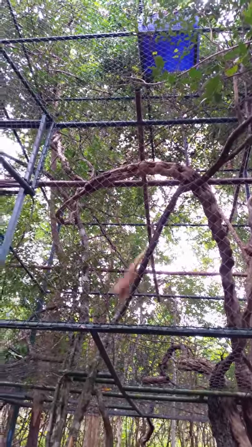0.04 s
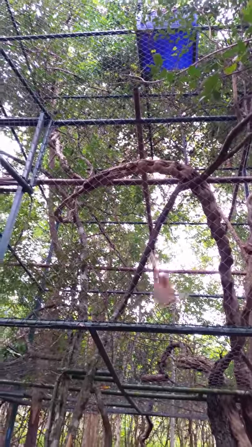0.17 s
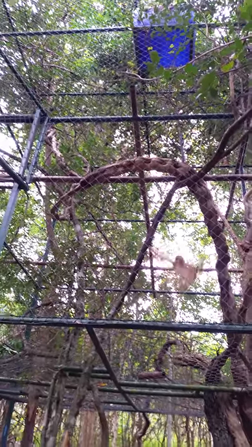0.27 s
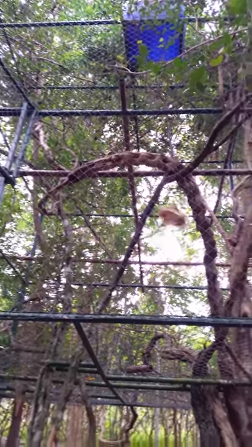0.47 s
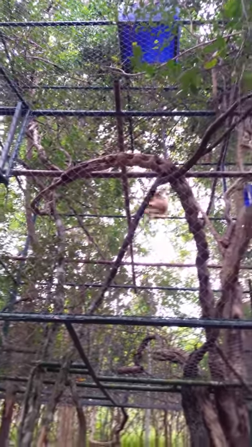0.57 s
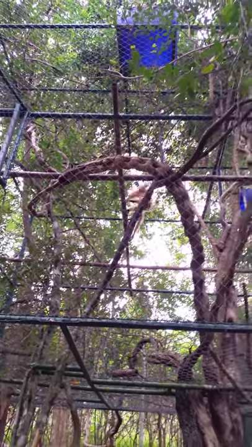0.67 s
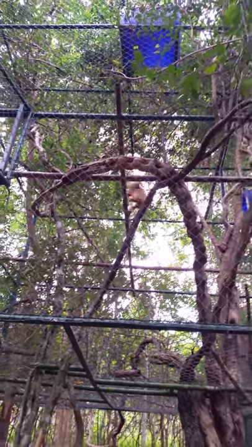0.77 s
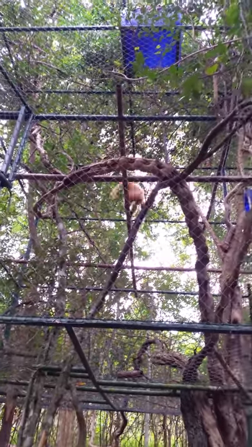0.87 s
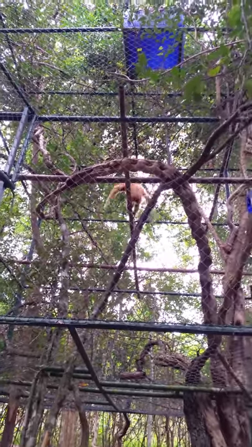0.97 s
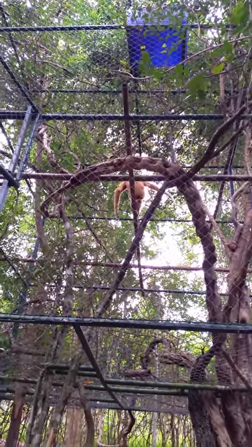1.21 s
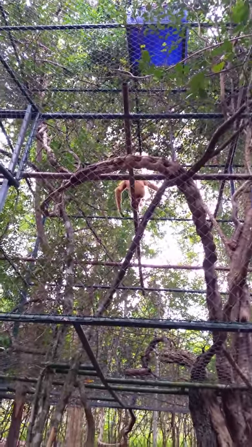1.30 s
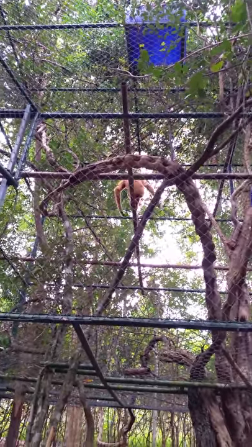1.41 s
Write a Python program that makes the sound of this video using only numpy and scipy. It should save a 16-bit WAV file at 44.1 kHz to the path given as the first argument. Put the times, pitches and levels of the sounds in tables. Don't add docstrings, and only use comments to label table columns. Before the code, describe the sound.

A gibbon gives three loud rising whoops, each stopping suddenly, echoing through a large leafy outdoor cage

```python
import sys
import numpy as np
from scipy import signal
from scipy.fft import rfft, irfft
from scipy.io import wavfile
from scipy.ndimage import uniform_filter1d, minimum_filter1d

SR = 44100
rng = np.random.default_rng(int(sys.argv[2]) if len(sys.argv) > 2 else 0)


def level_to_linear(level):
    exponent = np.asarray(level, float) / 20
    return 10 ** exponent


def materialize(psi):
    bounded = np.clip(np.atleast_2d(psi).T, -1, 1)
    quanta = np.round(bounded * 32767).astype(np.int16)
    wavfile.write(sys.argv[1], SR, quanta)


N = 63945
LEAD = SR // 2


def evened(x):
    return x / np.sqrt(np.mean(x ** 2) + 1e-20)


def read(points, hz):
    f, value = np.transpose(points)
    return np.interp(np.log(hz + 1), np.log(f + 1), value)


def colour(x, db_of):
    size = x.shape[-1]
    return irfft(rfft(x) * level_to_linear(db_of(np.fft.rfftfreq(size, 1 / SR))), size)


def add(mix, s, sound):
    part = mix[LEAD + round(s * SR):][:len(sound)]
    part += sound[:len(part)]


def wobble(count, size):
    once = uniform_filter1d(rng.standard_normal(count), size)
    return evened(uniform_filter1d(once, size))


def background():
    # frequency in Hz, density in dB.
    hum_curve = [(15, -40), (30, -18), (60, 0), (97, -1), (137, -8), (220, -21), (350, -33), (700, -33)]
    # frequency in Hz, gain in dB.
    air_curve = [(700, -30), (1500, -3), (4000, -10), (6000, -18), (7000, -50), (11000, -46), (13000, -30),
                 (15000, -45)]
    hum_db, air_db, same = -59.5, -66, 0.91
    a, b, c, d = rng.standard_normal((4, N))
    hum = np.array([a, same * a + np.sqrt(1 - same ** 2) * b])
    hum = colour(hum, lambda f: read(hum_curve, f) - 30 * (f > 800) - 30 * (f < 22))
    air = colour(np.array([c, d]), lambda f: read(air_curve, f))
    return level_to_linear(hum_db) * evened(hum) + level_to_linear(air_db) * evened(air)


def rustle(length_s, centre_hz, width_hz, db):
    grain_db = 2.5
    u = np.arange(0, length_s, 1 / SR) / length_s
    grains = rng.standard_normal(len(u)) * level_to_linear(grain_db * wobble(len(u), 80))
    band = colour(grains, lambda f: -6 * np.minimum(((f - centre_hz) / width_hz * 2) ** 2, 12))
    return level_to_linear(db) * np.sin(np.pi * u ** 0.43) * evened(band)


def rustles(mix):
    # start in seconds, length in seconds, centre in Hz, width in Hz.
    leaf_rows = [(.135, .08, 10300, 3500), (.16, .05, 7300, 1500), (.33, .14, 10500, 5000),
                 (.44, .014, 6800, 2500), (.36, .2, 400, 500), (.74, .15, 8500, 5000),
                 (.2, .1, 12500, 3000), (.66, .11, 450, 400), (-.15, .2, 9000, 5000),
                 (1.09, .2, 12500, 2000), (1.11, .2, 4800, 2200), (.7, .17, 5000, 3000),
                 (-.1, .3, 400, 400), (1.085, .014, 10500, 7000), (.96, .12, 13000, 2000),
                 (.64, .18, 13000, 3000), (.64, .1, 9800, 2500), (.36, .04, 9000, 1200)]
    leaf_db = [-53, -52.5, -54.5, -48.5, -52.5, -60, -48.5, -58.5, -59, -64, -52, -48, -66.5, -64.5, -73.5,
               -67, -69.5, -46]
    for (s, *row), db in zip(leaf_rows, leaf_db):
        add(mix, s, rustle(*row, db + 7))


def glide(length_s, from_hz, to_hz, db, bend, over_db, jitter, swell):
    flutter_db, soft_s = 2, .005
    u = np.arange(0, length_s, 1 / SR) / length_s
    hz = (from_hz + (to_hz - from_hz) * u ** bend) * (1 + jitter * wobble(len(u), 40))
    phase = 2 * np.pi * np.cumsum(hz) / SR
    tone = np.sin(phase)
    for k, harmonic_db in enumerate(over_db, 2):
        if k * to_hz < SR / 3:
            tone = tone + level_to_linear(harmonic_db) * np.sin(k * phase)
    arch = np.sqrt(np.sin(np.pi * u ** swell)) * np.minimum(u * length_s / soft_s, 1)
    return level_to_linear(db + flutter_db * wobble(len(u), 150)) * arch * np.sqrt(2) * tone


def wheezes(mix):
    # start in seconds, length in seconds, from Hz, to Hz, pitch jitter as a share.
    wheeze_rows = [(.768, .056, 3400, 5600, .035), (1.17, .026, 2500, 3350, .03),
                   (1.195, .08, 3700, 6800, .03), (1.27, .22, 6750, 6800, .008),
                   (1.33, .06, 5350, 5400, .015), (.438, .012, 5000, 5250, .035),
                   (.165, .05, 10330, 10380, .003)]
    wheeze_db = [-46, -39, -54, -74, -64, -46, -52]
    for (s, *row, jitter), db in zip(wheeze_rows, wheeze_db):
        add(mix, s, glide(*row, db + 11, 0.58, [], jitter, 0.4))


def thuds(mix):
    # start in seconds, length in seconds, from Hz, to Hz.
    thud_rows = [(.342, .05, 400, 230), (.645, .034, 390, 250), (.39, .025, 420, 480),
                 (.525, .03, 260, 230), (1.28, .04, 190, 160)]
    thud_db = [-53, -47.5, -58.5, -58.5, -65]
    for (s, *row), db in zip(thud_rows, thud_db):
        add(mix, s, glide(*row, db, 0.57, [], 0.015, 0.47))


def squeaks(mix):
    # start in seconds, length in seconds, from Hz, to Hz, bend of the slide.
    squeak_rows = [
        (.349, .034, 3000, 4850, 1.05),
        (.381, .055, 3900, 4650, .5),
        (.812, .14, 4400, 4500, .7),
    ]
    squeak_db = [-23.5, -32, -50]
    # harmonic 2 in dB, harmonic 3 in dB.
    squeak_over_db = [
        [-32, -30],
        [-22, -28],
        [-25, -13],
    ]
    for (s, *row, bend), db, over_db in zip(squeak_rows, squeak_db, squeak_over_db):
        add(mix, s, glide(*row, db, bend, over_db, .011, 0.14))


def overtones(hz, phase, harmonics_db, close_db, top_hz):
    # frequency in Hz, gain in dB.
    mouth = [(1200, 20.5), (1900, 10.5), (2600, 5), (3300, -4), (4300, -10.5), (5200, -2.5), (7000, -1.5),
             (12000, -1)]
    close_hz, high_fade, patchy_db = 1100, .8, 2
    thin_db = close_db * np.maximum(np.log2(hz / close_hz), 0)
    total = np.zeros(len(hz))
    for k, harmonic_db in enumerate(harmonics_db, 2):
        db = harmonic_db + read(mouth, k * hz) + thin_db * (2 + high_fade * (k - 4.5))
        if k == 2:
            db = db - 22 / (1 + (top_hz / (k * hz)) ** 14)
        else:
            db = db + patchy_db * wobble(len(hz), 300)
        total += level_to_linear(db) * np.sin(k * phase) * (k * hz < SR / 3)
    return total


def whoop(rows, pitch, harmonics_db, close_db, dull_db, top_hz, rasp):
    # frequency in Hz, gain in dB.
    breath_curve = [(800, -20), (2000, 0), (5000, -0.5), (6500, -12.5), (8500, -2.5), (11000, -18),
                    (12500, -23), (14500, -16)]
    # time in seconds, half width in seconds, level change in dB.
    level_dips = [(.281, 0.0041, -9.5), (0.313, 0.0072, -12), (0.327, 0.0013, -4), (.698, 0.0015, -28),
                  (0.723, 0.0026, -2.5), (.737, 0.0029, 7.5), (1.101, 0.0033, -10.5), (1.133, 0.0015, -5.5),
                  (1.148, 0.001, -3), (1.167, 0.0011, -21)]
    jitter, breath_db, dull_hz = 0.014, -28, 6700
    swell_s, stop_s = .016, 0.0014
    s, db, over_db = np.transpose(rows)
    t = np.arange(s[0], s[-1], 1 / SR)
    hz = uniform_filter1d(np.interp(t, *np.transpose(pitch)), size=300, mode="nearest")
    hz = hz * (1 + jitter * wobble(len(t), 60))
    phase = 2 * np.pi * np.cumsum(hz) / SR

    over = overtones(hz, phase, harmonics_db, close_db, top_hz)
    rasp = rasp * np.clip(2 * np.log2(hz / 980), 0, 1)
    over = over * (1 - rasp + rasp * wobble(len(t), 40))
    breath = evened(colour(rng.standard_normal(len(t)), lambda f: read(breath_curve, f)))

    level = level_to_linear(uniform_filter1d(np.interp(t, s, db), size=200, mode="nearest"))
    level = level * np.clip(np.minimum((s[-1] - t) / stop_s, (t - s[0]) / swell_s), 0, 1)
    for at_s, half_s, dip_db in level_dips:
        level = level * level_to_linear(dip_db * np.exp(-((t - at_s) / half_s) ** 2))
    voice = np.sin(phase) + level_to_linear(np.interp(t, s, over_db)) * over + level_to_linear(breath_db) * breath
    return colour(np.sqrt(2) * level * voice, lambda f: dull_db / (1 + (dull_hz / (f + 1)) ** 12))


def whoops(mix):
    # time in seconds, level in dB, overtone strength in dB.
    efforts = [
        [(.181, -22, -31), (.192, -29, -26), (.205, -24, -22.5), (.235, -21.5, -4.5), (.265, -25.5, 1.5),
         (.295, -16.5, -2), (.315, -15.5, 6), (.342, -18, 6), (.353, -29.5, -16)],
        [(.622, -50.5, -51), (.64, -34, -53), (.655, -23.5, -23.5), (.68, -28, 1.5), (.7, -25, 2),
         (.72, -17.5, -8), (.735, -29.5, 9.5), (.75, -18, -1), (.768, -28.5, 8)],
        [(1.05, -53.5, -24), (1.068, -38.5, -24), (1.087, -23.5, -24.5), (1.105, -27, -8.5), (1.125, -28.5, -2),
         (1.145, -20, -5.5), (1.16, -24, -15), (1.172, -22, 7.5), (1.181, -28.5, 5)],
    ]
    # time in seconds, pitch in Hz.
    pitches = [
        [(.176, 600), (.197, 790), (.212, 860), (.247, 975), (.268, 1115), (.293, 1450), (.325, 1920),
         (.343, 2190), (.353, 2380)],
        [(.62, 590), (.634, 695), (.65, 805), (.672, 920), (.692, 1030), (.706, 1230), (.724, 1510),
         (.748, 1950), (.77, 2300)],
        [(1.048, 600), (1.065, 700), (1.087, 828), (1.107, 950), (1.123, 1060), (1.141, 1320), (1.161, 1690),
         (1.175, 1920), (1.184, 2120)],
    ]
    harmonic_rows = [
        [-7, -16, -4.5, -9.5, -21, -27, -40.5],
        [-6, -18, -11, -19, -25.5, -33, -50.5],
        [-5.5, -17.5, -4.5, -19, -28.5, -21, -20],
    ]
    # overtone loss in dB per octave of rise, treble loss in dB,
    # Hz above which harmonic 2 dies, overtone rasp as a share.
    head_turns = [(-17, -3, 4600, .2), (-30, -11.5, 3400, .25), (-14, -66, 2800, .5)]
    earlier_s, earlier_db = -0.45, 2.5
    calls = list(zip(efforts, pitches, harmonic_rows, head_turns))
    for rows, pitch, harmonics_db, turn in calls:
        add(mix, rows[0][0], whoop(rows, pitch, harmonics_db, *turn))
    rows, pitch, harmonics_db, turn = calls[0]
    earlier = whoop(rows, pitch, harmonics_db, *turn)
    add(mix, rows[0][0] + earlier_s, level_to_linear(earlier_db) * earlier)


def leafy_tail():
    # frequency in Hz, t60 in seconds.
    decay = [(500, 0.6), (1300, 0.43), (3500, 0.43), (9000, 0.34)]
    start_s, far_db, far_t60_s = 0.0026, -20, 1.95
    taps = np.zeros((2, SR))
    at = np.arange(0, SR - 20, 20) + rng.integers(0, 20, (2, (SR - 1) // 20))
    np.put_along_axis(taps, at, rng.choice([-1., 1.], at.shape), 1)
    hz, t, z = signal.stft(taps, SR, nperseg=256)
    fade = level_to_linear(-60 * t / read(decay, hz)[:, None]) + level_to_linear(far_db - 60 * t / far_t60_s)
    tail = signal.istft(z * fade * np.clip(t / start_s, 0, 1), SR, nperseg=256)[1][:, :SR]
    return colour(tail / np.linalg.norm(tail[0]), lambda f: -14 / (1 + (f / 520) ** 4))


def cage(x, direct_db):
    # delay in seconds, left in dB, right in dB.
    near = [(.0094, -39, -8.5), (0.0168, -8, -27.5), (0.02, -20, -47), (.031, -20, -16)]
    # left in dB, right in dB.
    ground_db = [-51, -15]
    ground_s, lag_s, tail_db = .00388, 0.00021, -10.5
    room = np.zeros((2, SR))
    room[1, 0] += 1
    room[0, round(lag_s * SR)] += 1
    room[:, round(ground_s * SR)] += level_to_linear(ground_db)
    for s, left_db, right_db in near:
        room[:, round(s * SR)] += level_to_linear([left_db, right_db]) * rng.choice([-1, 1], 2)
    response = level_to_linear(direct_db) * room + level_to_linear(tail_db) * leafy_tail()
    return signal.fftconvolve(x[None], response, axes=1)[:, LEAD:LEAD + N] * level_to_linear(6.5)


def scene():
    hidden_db = -9
    mix, hidden = np.zeros((2, N + LEAD))
    rustles(hidden)
    wheezes(hidden)
    thuds(mix)
    squeaks(mix)
    whoops(mix)
    return background() + cage(hidden, hidden_db) + cage(mix, 0)


def face_right(x):
    # frequency in Hz, left minus right in dB.
    left_right = [(60, -2.5), (370, -0.5), (700, -3.5), (1250, -10.5), (2300, -17), (4200, -10.5),
                  (7750, -28.5), (14000, 8.5)]

    def gains_db(f):
        ratio = level_to_linear(read(left_right, f))
        return 20 * np.log10(np.array([2 * ratio, 2 + 0 * f]) / (1 + ratio))
    return colour(np.pad(x, ((0, 0), (0, LEAD)), "reflect"), gains_db)[:, :N]


def limit(x):
    ceiling = .9
    gain = np.minimum(ceiling / (abs(x).max(0) + 1e-9), 1)
    return x * uniform_filter1d(minimum_filter1d(gain, size=401), size=200)


def gate(x):
    gate_hz, gate_db, mask_db, patchy_db = 6900, -95, -66, 4.5
    spared_hz, spared_db = 11500, -6

    def smooth(p):
        return uniform_filter1d(uniform_filter1d(p, size=7, axis=0), size=5, axis=1)
    hz, t, z = signal.stft(x, SR, nperseg=1024, noverlap=768)
    power = (abs(z) ** 2).mean(0)
    patches = rng.standard_normal(power.T.shape)
    patches = uniform_filter1d(uniform_filter1d(patches, size=6, axis=0), size=5, axis=1)
    local_db = 10 * np.log10(abs(smooth(power)) + 1e-20)
    bar_db = np.maximum(gate_db, 10 * np.log10(power.sum(0) + 1e-20) + mask_db)
    bar_db = bar_db + patchy_db * evened(patches).T + spared_db * (hz > spared_hz)[:, None]
    kept = (local_db > bar_db) | (hz < gate_hz)[:, None]
    return signal.istft(z * kept, SR, nperseg=1024, noverlap=768)[1][:, :N]


def top_cut(x):
    return signal.sosfilt(signal.butter(12, 14700, fs=SR, output="sos"), x)


def record(dry):
    finished = gate(limit(face_right(dry)))
    return top_cut(finished)


dry = scene()
out = record(dry)
materialize(out)
```